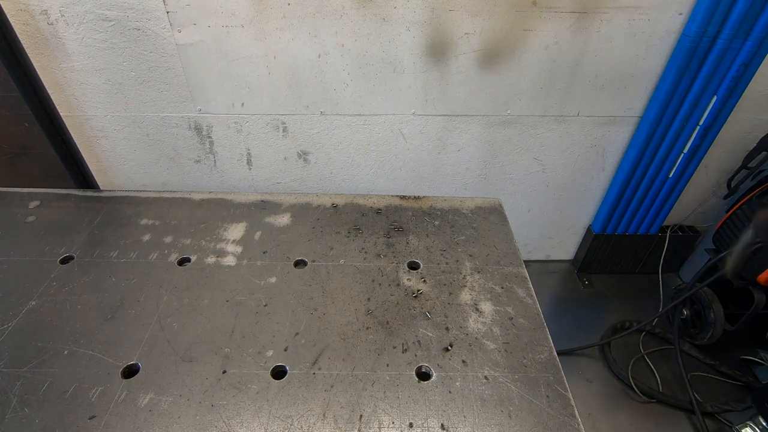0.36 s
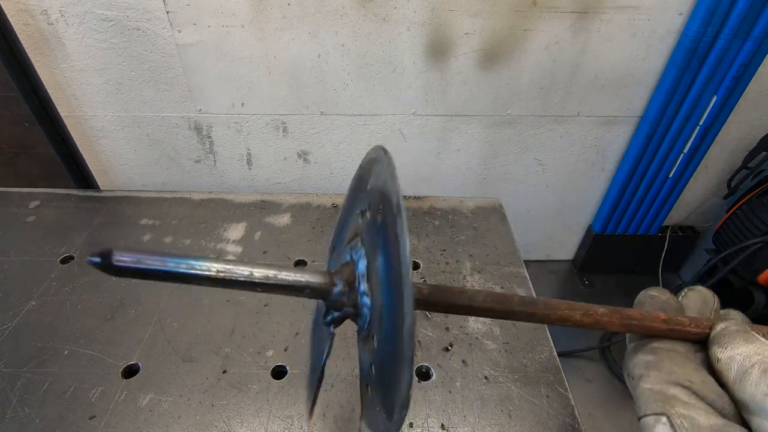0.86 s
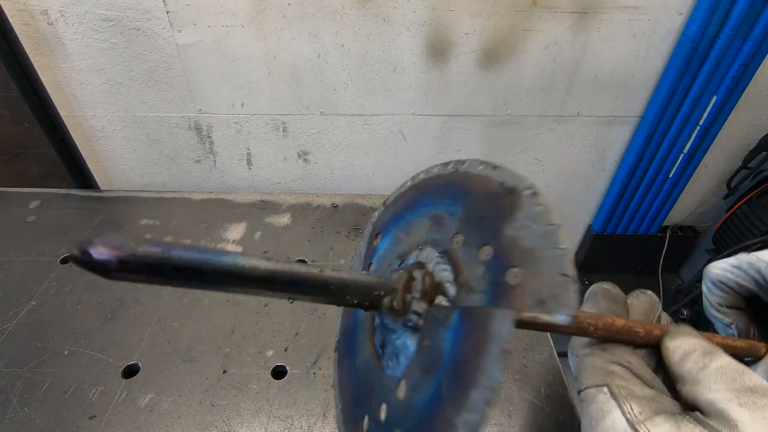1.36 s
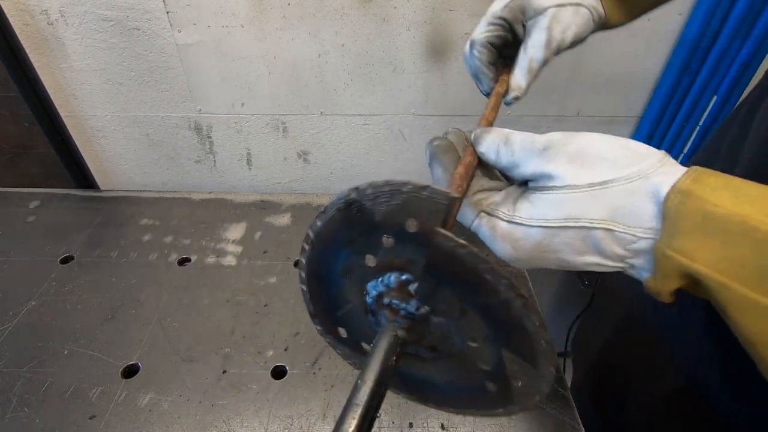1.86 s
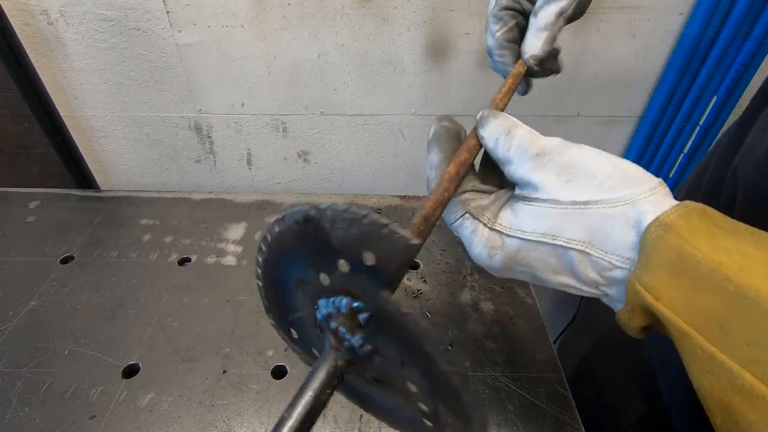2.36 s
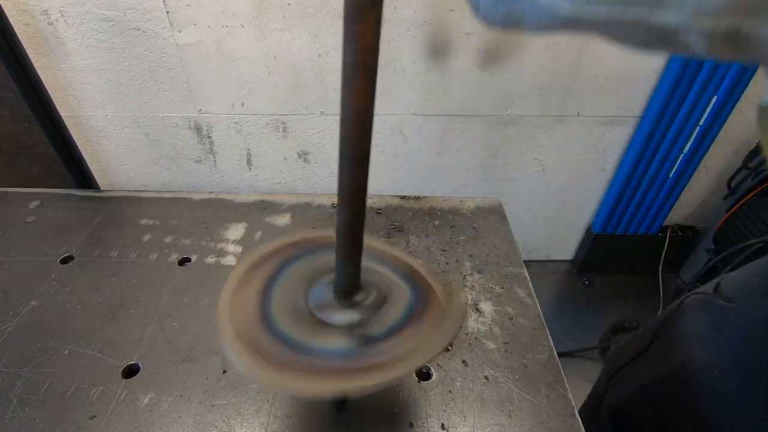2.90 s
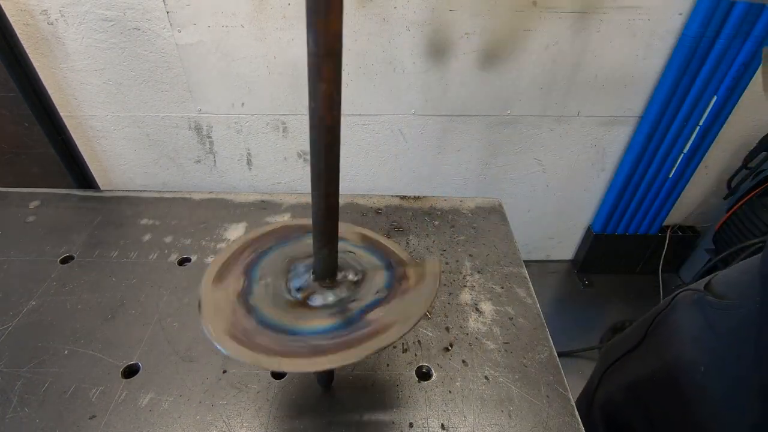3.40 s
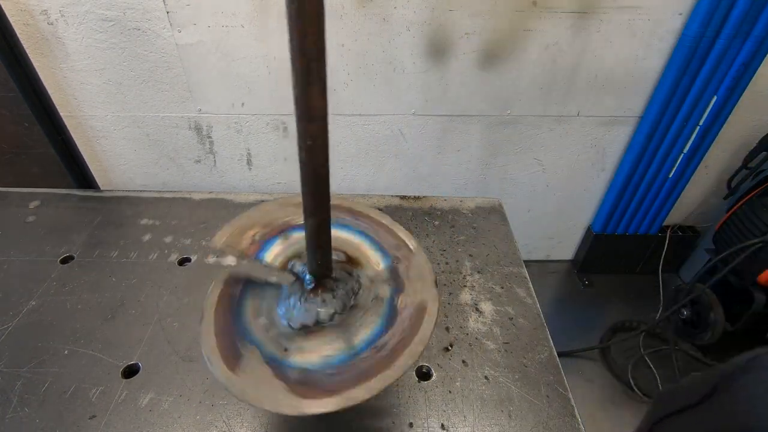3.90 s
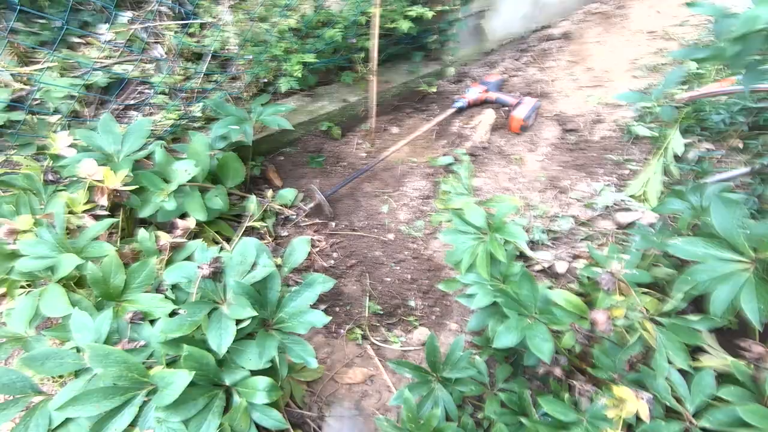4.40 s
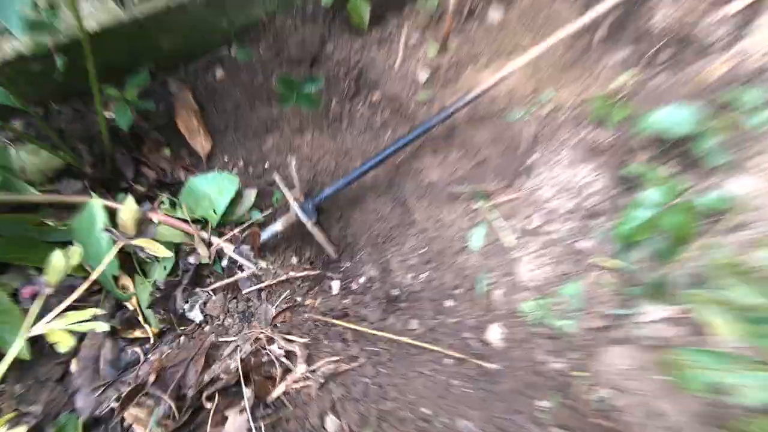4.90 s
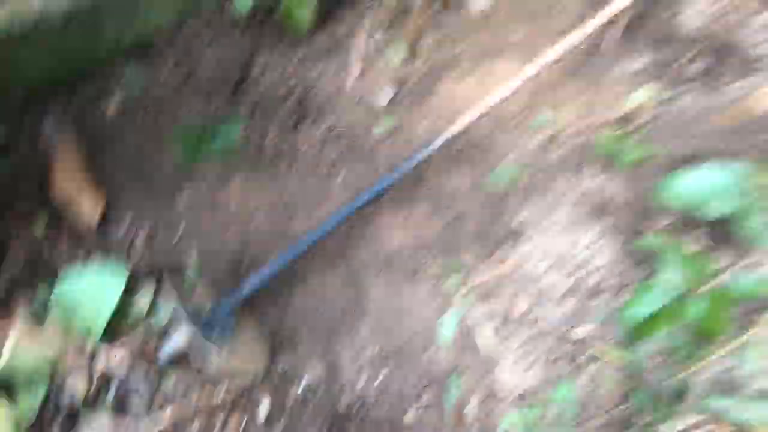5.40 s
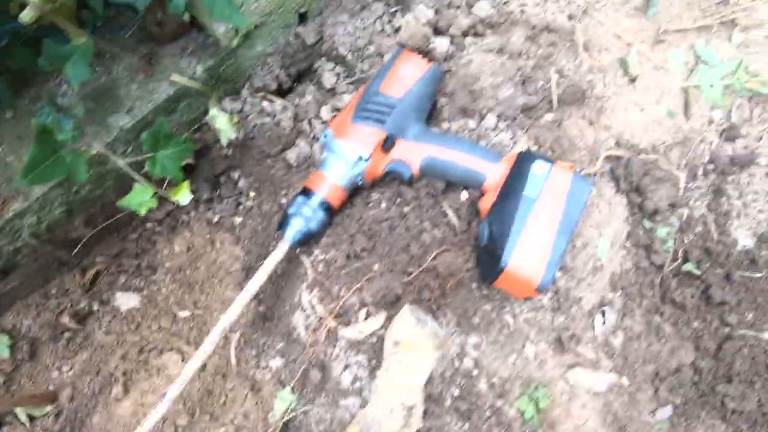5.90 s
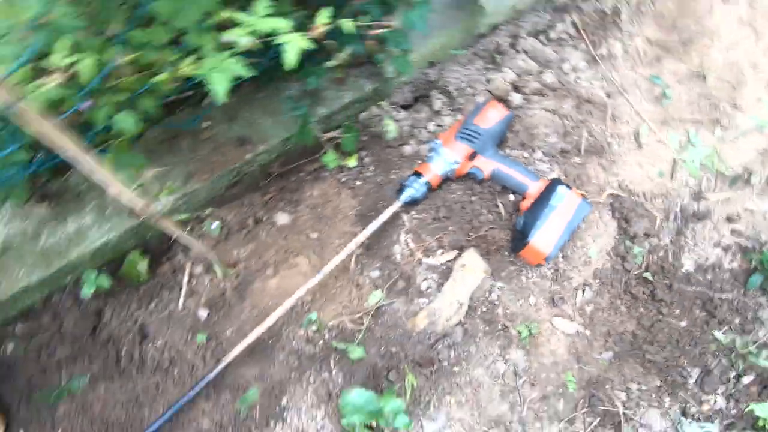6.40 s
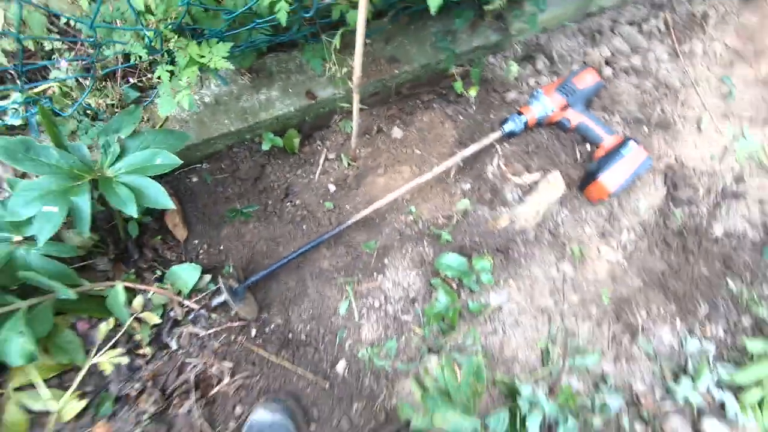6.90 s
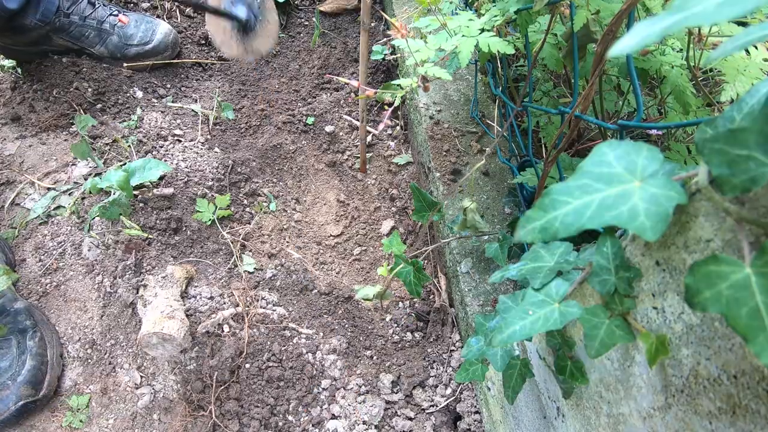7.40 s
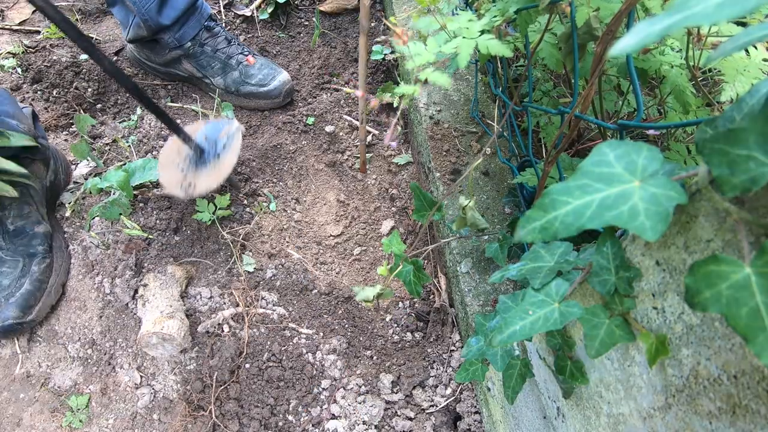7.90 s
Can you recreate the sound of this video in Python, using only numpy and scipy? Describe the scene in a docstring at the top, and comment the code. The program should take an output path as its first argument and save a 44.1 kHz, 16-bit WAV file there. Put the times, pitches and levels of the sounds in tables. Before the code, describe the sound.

From 0 to about 4.45 s a workshop fan holds a steady, thin whine near 1.6 kHz over broad airy hiss, shifting slightly in strength, with a tiny dip at 0.45 s. Soft dull bumps of handling fall around 0.5 to 0.7 s and 1.6 s; a faint, short leather scrape comes at 1.7 s. At 2.7 and 2.8 s two hard, bright metal knocks crack on a heavy steel bench, followed by a softer one at 2.9 s, each ringing briefly with a short room echo. At 4.45 s the whine cuts off abruptly into a far quieter garden with faint traffic. Leaves and cloth rustle close by, busiest until 5.8 s, with crisp twig ticks and muffled boot presses. Tiny gliding squeaks sound at 5.2 and 6.2 s. Rustling thins around 6 to 6.7 s, then returns; a very weak far whine wavers at 7.3 and 7.9 s, among last scuffs.

```python
"""A workshop, then a quiet garden. Indoors a fan whines as drifting motor tones and hisses as coloured
noise, while gloved hands turn a steel rod with a disc and drop its tip into a hole of a steel bench:
cracks, ringing modes and a short echo. Then boots press soil, leaves and cloth rustle as lumpy noise and
clicks, and twigs tick. Two thin gliding squeaks and a far wavering whine sound over faint traffic.
Dull bumps and a low rumble run through both places."""
import sys
import numpy as np
from scipy import signal
from scipy.fft import rfft, irfft, next_fast_len
from scipy.io import wavfile
from scipy.ndimage import uniform_filter1d

SR = 44100
rng = np.random.default_rng(int(sys.argv[2]) if len(sys.argv) > 2 else 0)


def ratio(d):
    """dB to gain"""
    e = np.asarray(d, float) / 20
    return 10 ** e


def store_pcm(level_fs):
    """Save levels as 16-bit WAV."""
    pcm = np.round(np.clip(level_fs, -1, 1) * 32767).astype(np.int16)
    wavfile.write(sys.argv[1], SR, np.atleast_2d(pcm).T)


N = 353682
T = np.arange(N) / SR
HZ, HOP = np.fft.rfftfreq(2048, 1 / SR), 512  # pitches and frame step of the shaped noise
CUT_S, GARDEN_FROM_S = 4.458, 4.4  # the workshop gives way to the garden; garden noises start
SPLICE_S = 0.447  # a splice: the workshop sound dips briefly


def evened(x):
    """Scales a sound to an average strength (rms) of 1."""
    return x / np.sqrt(np.mean(x ** 2) + 1e-20)


def read(points, hz):
    """Reads a curve between its points on a logarithmic pitch axis."""
    f, value = np.transpose(points)
    return np.interp(np.log(hz + 1), np.log(f + 1), value)


def panned(x, db):
    """Makes a left-right pair with a level difference; positive is louder on the left."""
    return np.array([x * ratio(db / 2), x * ratio(-db / 2)])


def add(mix, s, sound):
    """Mixes a sound in at time s, in place."""
    part = mix[..., round(s * SR):][..., :sound.shape[-1]]
    part += sound[..., :part.shape[-1]]


def drift(hz):
    """Random wander of rms 1; a higher hz wanders faster."""
    smooth = np.exp(-2 * np.pi * hz * 128 / SR)
    slow = signal.lfilter([1], [1, -smooth], rng.standard_normal(N // 128 + 2))
    return evened(np.interp(np.arange(N) / 128, np.arange(len(slow)), slow))


def swell(t, peak, rise, fall):
    """Gain of a movement: 12 dB down one rise before and one fall after its peak."""
    away = (t - peak) / np.where(t < peak, rise, fall)
    return ratio(-12 * np.minimum(away ** 2, 9))


def noise(colour_db, same, patchy_db, side_db=0 * HZ, start_s=0, stop_s=N / SR):
    """Two-channel random spectra with drifting loud and soft patches, silent outside start and stop."""
    count = min(round(stop_s * SR), N) - round(start_s * SR)
    a, b, c, d, patch = rng.standard_normal((count // HOP + 5, len(HZ), 5)).T
    patch = uniform_filter1d(patch, size=20, axis=0)
    patch = evened(uniform_filter1d(patch, size=5, axis=1))
    same = np.clip(read(same, HZ), -1, 1)[:, None]
    left = a + 1j * b
    right = same * left + np.sqrt(1 - same ** 2) * (c + 1j * d)
    z = np.array([left, right]) * ratio(colour_db[:, None] + patchy_db * patch)
    z = z * panned(1, side_db)[..., None]
    sound = signal.istft(z, nperseg=4 * HOP, noverlap=3 * HOP)[1][:, :count]
    out = np.zeros((2, N))
    add(out, start_s, evened(sound))
    return out


def puff(t, centre, octaves, edge):
    """Two-channel noise around a pitch, with a share of broad bright edge."""
    hz = np.fft.rfftfreq(len(t), 1 / SR) + 1
    burst = rng.standard_normal((3, len(t)))
    colour = edge * (hz > 800) / (1 + hz / 5000)
    colour = colour + np.exp(-(np.log2(hz / centre) / octaves) ** 2)
    return evened(irfft(rfft(burst[0] + 0.45 * burst[1:]) * colour))


# Fan past moving hands and disc: (time [s], whine level [dB], shading [dB])
FAN_MOVES = [(0.05, -39, 0.5), (0.35, -36.5, 1.5), (0.47, -39, -0.5), (0.6, -36.5, -0.06), (1.5, -38, 0.5),
             (1.7, -40, 1), (1.9, -39.5, 2.5), (2.3, -41.5, 2), (3.1, -38.5, 2), (3.95, -39, 0.66),
             (4.2, -36.5, -0.2), (4.42, -37, 0.5)]
# Motor tones: (multiple of the whine pitch [ratio], relative level [dB])
MOTOR_ORDERS = [(.4, -61), (.8, -55.5), (1.2, -59.5), (1.6, -59.5), (2.399, -58.5), (3.001, -53), (4, -56)]
# Swells of the tone an octave above the whine: (peak time [s], half length [s], relative level [dB])
OCTAVE_SWELLS = [(0.298, 0.1, -48), (1.3, 0.47, -51.5)]
# Unsteady low tones of the machine: (pitch [Hz], relative level [dB], gain per dB of shading [dB])
LOW_TONES = [(151, -72, 0.), (440.5, -65.5, 3)]
# Colour of the fan's air hiss: (pitch [Hz], relative level [dB])
AIR_COLOUR = [(30, -40), (340, -38), (420, -22), (900, -15.5), (1170, -19.5), (1400, -11), (1900, -16),
              (9000, -16.5), (12000, -21.5), (15800, -29)]
# Casing resonances in the hiss: (pitch [Hz], width [Hz], boost [dB])
CASING = [(255, 140, 10.5), (552.4, 49, 9), (868, 170, 6), (5820, 180, 6)]
# How alike the hiss is left and right: (pitch [Hz], likeness [0 to 1])
HISS_LIKENESS = [(100, 0.68), (700, 1), (2500, 0.65), (6000, 0.73)]
# Left-right balance of the hiss: (pitch [Hz], left over right [dB])
HISS_SIDE = [(1000, 0.5), (3500, -3), (12000, 0)]


def fan():
    """Motor tones at fixed multiples of the whine over air hiss; moving hands and disc shade both."""
    whine_hz, usual_db = 1643.1, -40
    s, *columns = np.transpose(FAN_MOVES)
    whine_db, shade_db = (np.interp(T, s, c) for c in columns)
    whine_side = 6.5 - 0.6 * (whine_db - usual_db)  # the whine dips mostly on the right
    phase = 2 * np.pi * whine_hz * T + 0.13 * drift(0.21)
    phase = phase + np.pi * (T > SPLICE_S)  # the whine's phase jumps half a turn at the splice
    lead = np.array([[-1], [1]])  # the tones run ahead on the right
    whine_gain = ratio(whine_db + 0.077 * drift(2.3))
    tones = panned(whine_gain, whine_side) * np.sin(phase + 0.05 * lead)
    octave = ratio(-51.5 - 3.1 * shade_db)
    for peak, half, db in OCTAVE_SWELLS:
        octave = octave + ratio(db) * swell(T, peak, half, half)
    tones += panned(octave * ratio(1.1 * drift(6.5)), -6.5) * np.sin(2 * phase + 0.7 * lead)
    for k, db in MOTOR_ORDERS:
        tones += ratio(db + 2.7 * drift(5.7)) * np.sin(k * phase + 0.5 * drift(4.) + 0.23 * k * lead)
    for hz, db, shaded in LOW_TONES:
        gain = ratio(db + shaded * shade_db + 4.1 * drift(8.))
        tones += gain * np.sin(2 * np.pi * hz * T + 1.0 * drift(1.9))
    humps = sum(db / (1 + (2 * (HZ - f) / width) ** 2) for f, width, db in CASING)
    air = noise(read(AIR_COLOUR, HZ) + humps, HISS_LIKENESS, 1.35, read(HISS_SIDE, HZ), stop_s=CUT_S + .1)
    hiss_gain = panned(ratio(-39 - shade_db), 2.0 * (whine_side - 6.))
    return np.sqrt(2) * tones + air * hiss_gain


def ring(modes, t, spread_db):
    """Dying modes, each struck a little differently and starting up or down."""
    luck = rng.standard_normal((len(modes), 2))
    out = np.zeros(len(t))
    for (hz, db, t60), (u, v) in zip(modes, luck):
        out += ratio(db + spread_db * u - 60 * t / t60) * np.sign(v) * np.sin(2 * np.pi * hz * t)
    return out


# Steel bench modes before softness acts: (pitch [Hz], relative level [dB], time to die by 60 dB [s])
BENCH_MODES = [(445, -14.5, 0.29), (726, -7.5, 0.22), (660, -12, 0.13), (990, -7, 0.1), (1260, -5.5, 0.09),
               (2220, -4.5, 0.096), (3260, -0.5, 0.08), (3510, -3.5, 0.069)]
# Disc modes: (pitch [Hz], relative level [dB], time to die by 60 dB [s])
DISC_MODES = [(8600, -10, 0.049), (9000, -9.5, 0.067), (9200, -15, .1), (10800, -16, 0.075),
              (12160, -19, 0.063)]


def blow(t, disc_db, dull_db):
    """A crack, then the plate rings and rattles on as noise, duller for a soft blow; the disc rings above."""
    hard_db, hard_t60 = -7, 0.18  # dullness [dB per octave] and dying time [s] of a hard blow
    softness = hard_db - dull_db
    rise = 0.0004 * (dull_db / hard_db) ** 2  # seconds; duller blows rise and die slower
    t60 = hard_t60 + 0.0053 * softness
    hz = np.fft.rfftfreq(len(t), 1 / SR)
    slope = ratio(dull_db * np.log2(1 + hz / 1500)) / (1 + (hz / 12000) ** 4)
    slope = slope * hz ** 2 / (hz ** 2 + 500 ** 2)
    rattle = evened(irfft(rfft(rng.standard_normal(len(t))) * slope)) * ratio(-60 * t / t60)
    crack = irfft(slope * np.exp(-2j * np.pi * hz * 2 * rise))
    rattle = rattle - 7.5 * crack / crack.max()
    # the tip chatters in the hole and roughens the ring, more after a soft blow
    uneven = evened(uniform_filter1d(rng.standard_normal(len(t)), size=250))
    chatter = ratio(0.13 * dull_db * uneven)
    plate = []
    for f, db, decay in BENCH_MODES:
        db = db + dull_db * np.log2(f / 750) ** 2 / 4
        db = db - 2 * softness * abs(np.log2(f / 700))  # a soft blow wakes mainly modes near the main note
        plate.append((f, db, decay * t60 / hard_t60))
    struck = 0.78 * ratio(dull_db) * rattle + 0.49 * chatter * ring(plate, t, 2.0)
    jangle = ratio(-16.0 - 60 * t / 0.051) * puff(t, 9800., 0.22, 0)[0]
    disc = ring(DISC_MODES, t, 2.6) + jangle
    return struck * np.minimum(t / rise, 1) + ratio(disc_db) * disc


# Rod tip on the bench: (time [s], relative level [dB], disc ring level [dB], dullness [dB per octave])
KNOCKS = [(2.7174, -13.5, 0, -7), (2.809, -11.5, -10, -6.5), (2.915, -20.5, -5.5, -18.5)]
# Left-right difference of a blow: (pitch [Hz], gain of the difference part [dB])
KNOCK_SIDE = [(1200, -23), (2500, -4.5), (5000, -3), (10000, -13)]
# Workshop echo: (pitch [Hz], time to die by 60 dB [s])
WORKSHOP_ECHO = [(300, 0.39), (10000, 0.15)]


def knocks():
    """Each blow is alike left and right in the bass and unlike in the treble; the walls answer."""
    mid, side, t = np.zeros(N), np.zeros(N), np.arange(SR // 2) / SR
    for s, db, *colour in KNOCKS:
        add(mid, s, ratio(db) * blow(t, *colour))
        add(side, s + 0.00019, ratio(db) * blow(t, *colour))
    size = next_fast_len(N, True)
    side_gain = ratio(read(KNOCK_SIDE, np.fft.rfftfreq(size, 1 / SR)))
    side = irfft(rfft(side, size) * side_gain, size)[:N]
    out = np.array([mid + side, mid - side])
    # the echo is noise that dies at its own rate at each pitch
    hz, t, z = signal.stft(rng.standard_normal((2, SR // 2)), SR, nperseg=256)
    tail = signal.istft(z * ratio(-60 * t / read(WORKSHOP_ECHO, hz)[:, None]), SR, nperseg=256)[1]
    echo = signal.fftconvolve(out, tail / np.linalg.norm(tail[0]), axes=1)[:, :N]
    out = out + ratio(-25.0) * echo
    no_boom = signal.butter(3, 370., "high", fs=SR, output="sos")  # the blows carry little below about 370 Hz
    return signal.sosfilt(no_boom, out)


# Leather sliding on the rod: (time [s], relative level [dB], half length [s])
GLOVE_SLIDE = (1.725, -32, 0.023)
# How alike glove, leaf and traffic noise are left and right: (pitch [Hz], likeness [0 to 1])
LIKENESS = [(200, 0.99), (1000, 0.5), (4000, 0.14), (15000, 0.78)]


def glove():
    """A short bright scrape: coloured noise that swells and fades smoothly."""
    s, db, half = GLOVE_SLIDE
    colour = read([(1200, -18), (3500, -1.5), (15000, -8)], HZ)
    scrape = noise(colour, LIKENESS, 2.6, start_s=s - 4 * half, stop_s=s + 4 * half)
    return scrape * ratio(db) * np.exp(-((T - s) / half) ** 2)


def crackle(low_hz, high_hz, per_s, busy, cycles):
    """Clicks of a few cycles at scattered pitches and sides, coming in clumps."""
    out, first = np.zeros((2, N)), round(GARDEN_FROM_S * SR)
    for hz in np.geomspace(low_hz, high_hz, num=6):
        size = ratio(5.1 * np.minimum(rng.exponential(1, N - first), 3))
        size = size * (rng.random(N - first) < per_s * busy[first:] / SR)
        t = np.arange(round(cycles * SR / hz)) / SR
        click = np.sin(2 * np.pi * hz * t) * np.hanning(len(t))
        clicks = signal.oaconvolve(size, click)[:N - first]
        out[:, first:] += panned(clicks, 5.2 * drift(26)[first:])
    return out / out[:, first:].std()


# Leaves and cloth brushed:
# (peak time [s], rise [s], fall [s], relative level [dB], coarse part over fine part [dB])
BRUSHES = [(4.48, 0.016, 0.036, -45, -8), (4.66, 0.19, 0.27, -50, -1.5), (4.88, 0.19, 0.039, -51.5, -6),
           (5.03, 0.093, 0.069, -55, -6), (5.2, 0.17, 0.099, -64, 0), (5.472, 0.13, 0.073, -58.5, 1),
           (5.61, 0.025, 0.16, -54, 6), (5.8, 0.12, 0.095, -58, -3), (6.22, 0.057, 0.21, -63, -16),
           (6.38, .12, 0.19, -64, 3.5), (6.62, 0.31, 0.056, -69, -18), (6.86, 0.1, 0.085, -59.5, -3),
           (7.09, 0.17, 0.21, -58.5, -0.5), (7.28, 0.05, 0.18, -53, -10), (7.4, 0.13, 0.29, -59.5, -11),
           (7.835, 0.066, 0.037, -53, -4), (7.89, 0.022, 0.05, -59.5, 9), (7.94, 0.044, 0.047, -58, -9),
           (8.015, 0.031, .05, -59.5, -4)]
# Boots pressing the soil: (peak time [s], half length [s], relative level [dB])
TREADS = [(4.805, 0.21, -59.5), (5.018, 0.036, -54), (5.464, 0.056, -63), (5.67, 0.11, -54.5),
          (6.863, 0.17, -64), (7.85, 0.16, -63)]
# Colours of fine, coarse and heavy rubbing: (pitch [Hz], relative level [dB])
FINE_COLOUR = [(3500, -6.5), (5500, -2.5), (11400, 1), (15800, -11.5)]
COARSE_COLOUR = [(1000, -14), (1800, -13), (4000, -6.5), (6000, -14)]
HEAVY_COLOUR = [(280, -24), (480, 7), (1300, 1.5), (2000, -29)]
# Where the rustle sits: (time [s], left over right [dB])
LEAVES_SIDE = [(4.5, 0), (5.4, -1), (5.7, -4.5), (6.2, -2), (8, 3)]


def rustle():
    """Three colours of rubbing noise in short lumps, with crackles where the lumps are."""
    t = T[::64]
    still = ratio(-80) ** 2  # leaves never rest fully
    fine = still + sum((ratio(db) * swell(t, *when)) ** 2 for *when, db, _ in BRUSHES)
    coarse = still + sum((ratio(db + share_db) * swell(t, *when)) ** 2 for *when, db, share_db in BRUSHES)
    heavy = still + sum((ratio(db) * swell(t, s, half, half)) ** 2 for s, half, db in TREADS)
    fine, coarse, heavy = (np.interp(T, t, np.sqrt(power)) for power in (fine, coarse, heavy))
    lumps = ratio(3.03 * drift(22))
    high = lumps * noise(read(FINE_COLOUR, HZ), LIKENESS, 2.9, start_s=GARDEN_FROM_S)
    high += 0.52 * crackle(6900.0, 13000., 60., lumps ** 2, cycles=2.6)
    mid = lumps * noise(read(COARSE_COLOUR, HZ), LIKENESS, 2.0, start_s=GARDEN_FROM_S)
    mid += 0.42 * crackle(2110.0, 4500.0, 45., lumps ** 2, cycles=5.4)
    low = np.sqrt(lumps) * noise(read(HEAVY_COLOUR, HZ), LIKENESS, 4.8, start_s=GARDEN_FROM_S)
    leaves = fine * high + coarse * mid + heavy * low
    return leaves * panned(0.95, np.interp(T, *np.transpose(LEAVES_SIDE)))


# Twigs, grit and clods: (time [s], relative level [dB], pitch [Hz])
SNAPS = [(4.601, -25, 10860), (4.61, -25, 10400), (4.641, -25, 12000), (4.769, -33, 9600),
         (4.8515, -32, 3800), (4.917, -26, 7340), (5.0003, -33.5, 3730), (5.021, -27.5, 590),
         (5.182, -43.5, 2220), (5.208, -33, 10500), (5.494, -43, 2820), (5.6, -33.5, 2500),
         (5.657, -32, 1570), (5.674, -29, 1010), (6.14, -48.5, 1190), (6.429, -41, 2960),
         (7.086, -44, 3000), (7.163, -28.5, 7900), (7.645, -32.5, 1240), (7.765, -44, 960),
         (7.88, -37.5, 686), (7.904, -45, 1200)]


def snaps():
    """Each a sharp tick and a puff of noise around its own pitch, from where the leaves move."""
    out, t = np.zeros((2, N)), np.arange(SR // 10) / SR
    for s, db, hz in SNAPS:
        tick = 0.65 * ratio(-60 * t * hz / 13) * np.sin(2 * np.pi * hz * t)  # dies by 60 dB in 13 cycles
        shape = 0.36 / (1 + hz / 4000) * ratio(-60 * t / 0.082)
        shape = shape * np.minimum(t * hz / 1.8, 1)  # rises over 1.8 cycles
        add(out, s, ratio(db) * (tick + shape * puff(t, hz, 1.0, 0.52)))
    return out * panned(1.0, np.interp(T, *np.transpose(LEAVES_SIDE)))


# Leaves, stems and soil scuffed: (start time [s], length [s], relative level [dB], pitch [Hz])
SCUFFS = [(4.567, 0.022, -56, 4040), (4.81, 0.036, -54.5, 234), (4.858, .11, -60, 480),
          (6.305, 0.023, -60, 2410), (6.513, 0.016, -60, 2320), (6.871, .2, -66.5, 3970),
          (6.943, 0.021, -62, 3900), (7.658, 0.094, -62, 900), (7.818, 0.019, -52.5, 4500),
          (7.827, 0.046, -58, 560)]


def scuffs():
    """Short uneven rubs that sound through one resonance of the thing rubbed."""
    out, uneven = np.zeros((2, N)), ratio(3.2 * drift(45))
    for s, length, db, hz in SCUFFS:
        t = np.arange(round(length * SR / 2) * 2) / SR
        add(out, s, ratio(db) * np.sin(np.pi * np.sqrt(t / length)) * puff(t, hz, 0.27, 0.14))
    return out * uneven


# Squeaks: (start time [s], fundamental where the fast glide ends [Hz], bright part level [dB],
# whistle level [dB], whistle half length [s])
SQUEAKS = [(5.195, 4100, -50.5, -51, 0.029), (6.173, 4140, -47.5, -49, 0.016)]


def squeaks():
    """A stick-slip tone glides up bright, then settles to a thin whistle; its fundamental is not heard."""
    slip_hz, glide_s, creep_hz_per_s = 2200., 0.039, 2000  # start pitch, fast glide, slow climb after it
    out, t = np.zeros(N), np.arange(SR // 6) / SR
    for s, top_hz, bright_db, whistle_db, half in SQUEAKS:
        glide = uniform_filter1d(np.minimum(t / glide_s, 1), size=400)
        hz = slip_hz + (top_hz - slip_hz) * glide + creep_hz_per_s * np.maximum(t - glide_s, 0)
        phase = 2 * np.pi * np.cumsum(hz) / SR
        bright = ratio(bright_db) * swell(t, 0.027, 0.01, 0.01)
        whistle = ratio(whistle_db) * swell(t, 0.076, half, half) + 0.13 * bright
        overtones = np.sin(3 * phase) + 0.57 * np.sin(4 * phase)
        add(out, s, whistle * np.sin(2 * phase) + bright * overtones)
    return out * ratio(3.2 * drift(70.))


# Soft bumps of body, bench and boots: (time [s], relative level [dB], pitch [Hz])
BUMPS = [(0.511, -40.5, 252), (0.574, -35, 271), (0.724, -31, 275), (1.61, -41, 264), (2.815, -36, 258),
         (5.021, -43, 222), (5.677, -42, 227), (7.018, -43, 133), (7.649, -45, 182), (7.77, -49, 159)]


def bumps():
    """Dull low pushes, a tone and a puff of noise, that die by 60 dB in about 0.07 s."""
    out, t = np.zeros((2, N)), np.arange(SR // 5) / SR
    for s, db, hz in BUMPS:
        body = 1.32 * np.sin(2 * np.pi * hz * t) + 1.1 * puff(t, hz, 0.73, 0)
        add(out, s, ratio(db - 60 * t / 0.07) * (1 - np.exp(-t / 0.0059)) * body)
    return out


# Far whines: (start time [s], length [s], pitch aimed at [Hz], relative level [dB])
FAR_WHINES = [(7.285, 0.26, 1472, -71), (7.919, .12, 1500, -76)]


def far_whine():
    """A weak wavering tone whose pitch rises quickly and then sinks."""
    out, waver = np.zeros(N), ratio(5.1 * drift(60))
    for s, length, top_hz, db in FAR_WHINES:
        t = np.arange(0, length, 1 / SR)
        hz = top_hz - 111 * np.exp(-t / 0.02) - 2200 * t ** 2
        tone = np.sin(2 * np.pi * np.cumsum(hz) / SR)
        add(out, s, ratio(db) * tone * signal.windows.tukey(len(t), .2))
    return out * waver


# Colour of the far traffic: (pitch [Hz], relative level [dB])
TRAFFIC_COLOUR = [(30, -53), (124, -2.5), (180, -22), (235, -9.5), (345, -16), (569, 0), (844, -22.5),
                  (2170, -15), (6900, -29), (15800, -19.5)]


def traffic():
    """Far traffic as soft coloured noise, fainter from 7.1 s on."""
    hush = ratio(-65.5) * noise(read(TRAFFIC_COLOUR, HZ), LIKENESS, 1.1, start_s=GARDEN_FROM_S)
    return hush * ratio(np.where(T > 7.1, -5, 0))


# Colour of the low rumble: (pitch [Hz], relative level [dB])
RUMBLE_COLOUR = [(25, -21), (125, 1), (235, 2.5), (330, -19.5)]
# Strength of the rumble: (time [s], level before its lumps [dB])
RUMBLE_LEVEL = [(0, -70.5), (1.3, -74), (1.9, -86), (4.6, -73.5), (5.8, -71), (6.1, -87), (8, -82)]


def rumble():
    """Lumpy low noise that comes and goes, nearly alike left and right."""
    level_db = np.interp(T, *np.transpose(RUMBLE_LEVEL)) + 5.5 * drift(6.2)
    return ratio(level_db) * noise(read(RUMBLE_COLOUR, HZ), [(30, 0.9)], 1.9)


def scene():
    """Workshop, then garden, joined by a short cross-fade; bumps and rumble sound in both."""
    indoors = np.clip((CUT_S - T) / 0.0017 + .5, 0, 1)
    splice = np.clip(abs(T - SPLICE_S) / 0.0037, .15, 1)
    workshop = splice * fan() + knocks() + glove()
    garden = rustle() + snaps() + scuffs() + squeaks() + far_whine() + traffic()
    return indoors * workshop + (1 - indoors) * garden + bumps() + rumble()


def top_cut(x):
    """Nothing passes above the cut-off."""
    return signal.sosfilt(signal.butter(12, 16820, fs=SR, output="sos"), x)


def record(dry):
    """Takes off the highest treble and finishes the mix."""
    edge = signal.firwin(511, 15850, window=("kaiser", 9), fs=SR)
    mix = signal.oaconvolve(dry, edge[None], "same")
    return top_cut(mix)


dry = scene()
out = record(dry)
store_pcm(out)
```